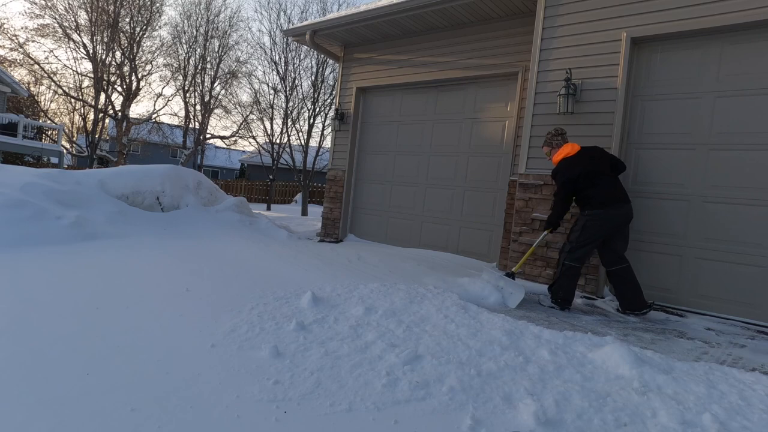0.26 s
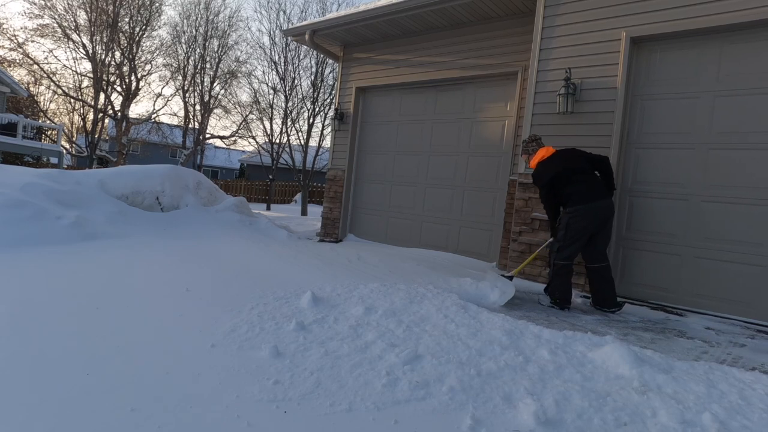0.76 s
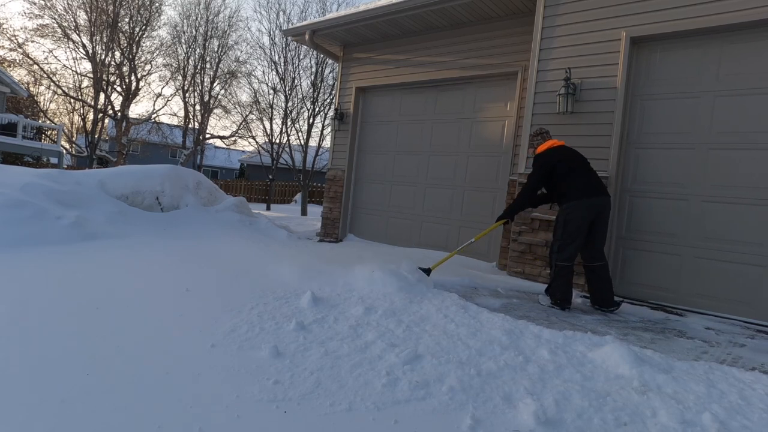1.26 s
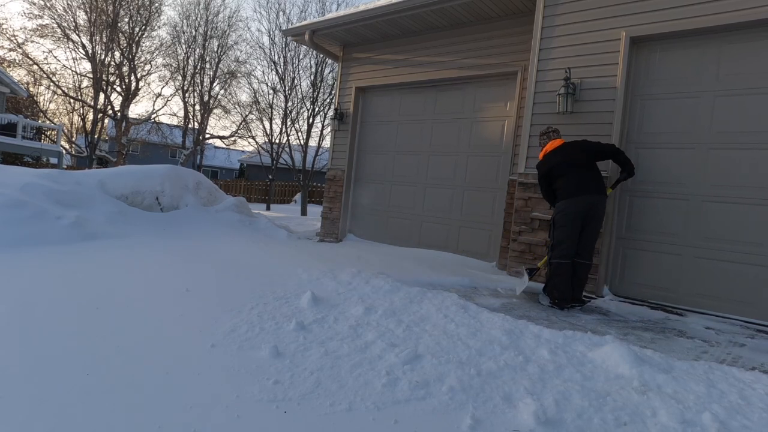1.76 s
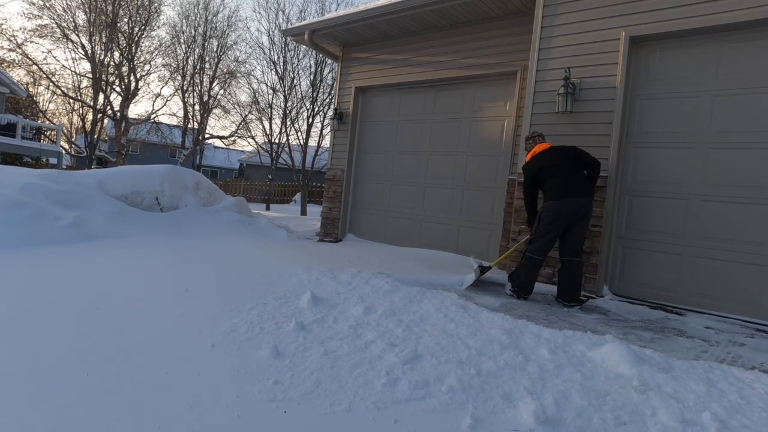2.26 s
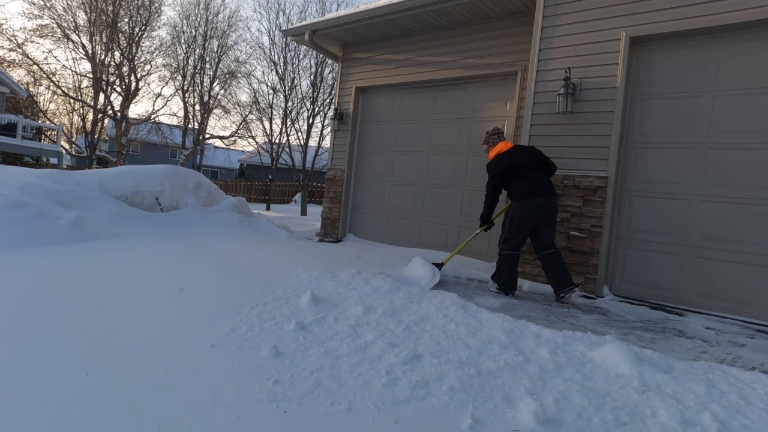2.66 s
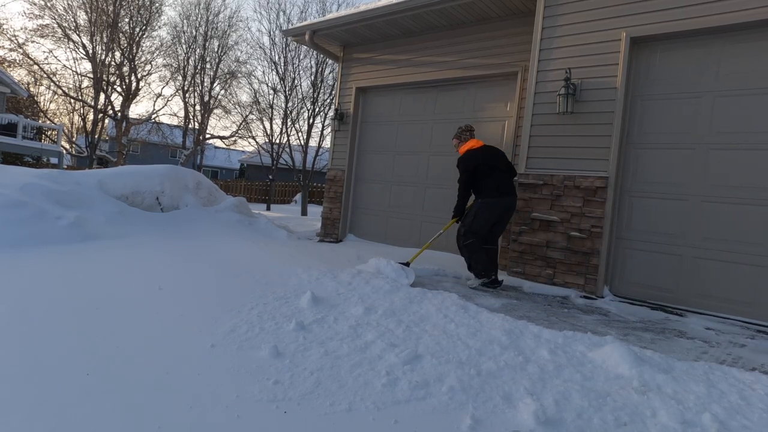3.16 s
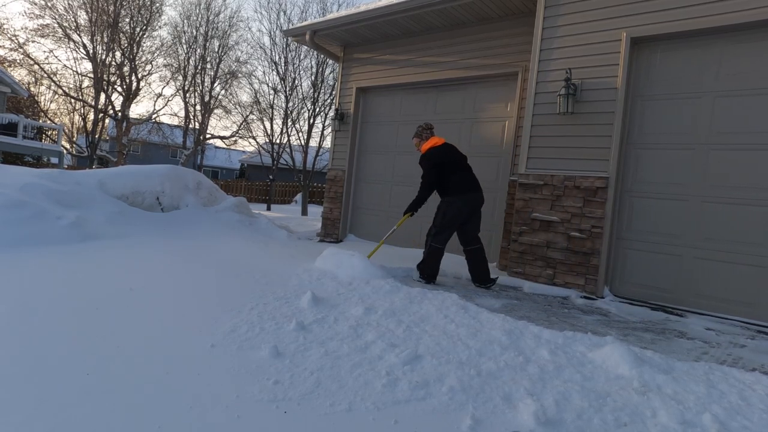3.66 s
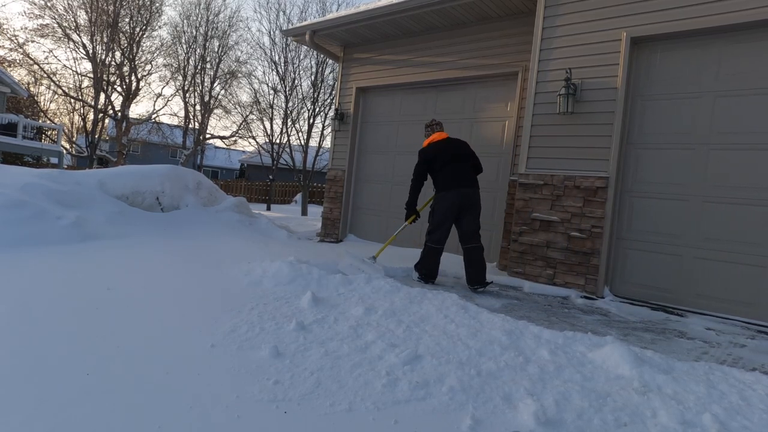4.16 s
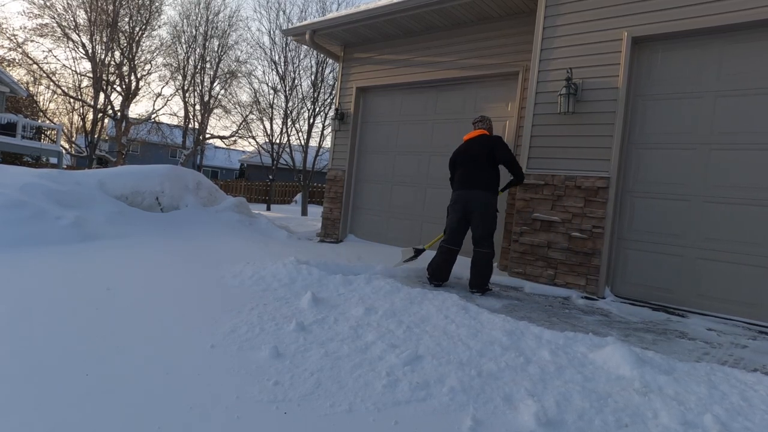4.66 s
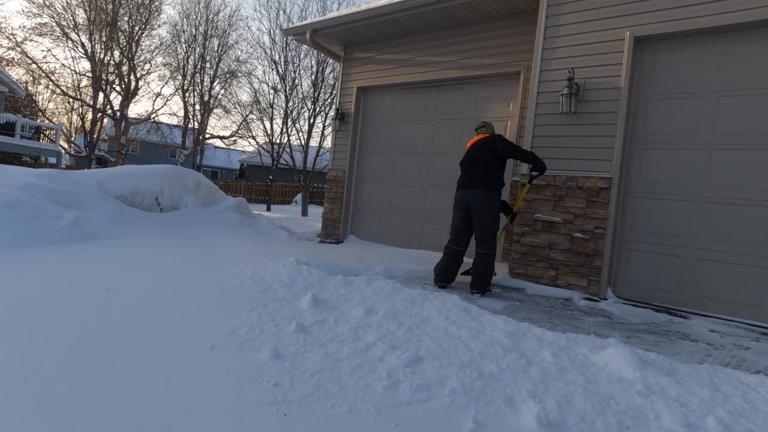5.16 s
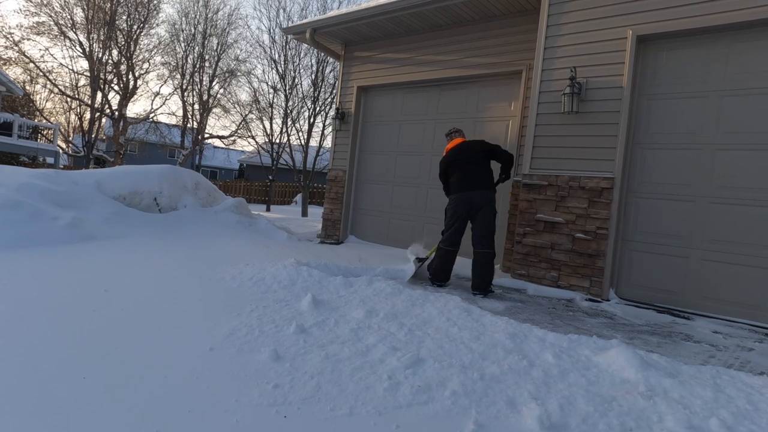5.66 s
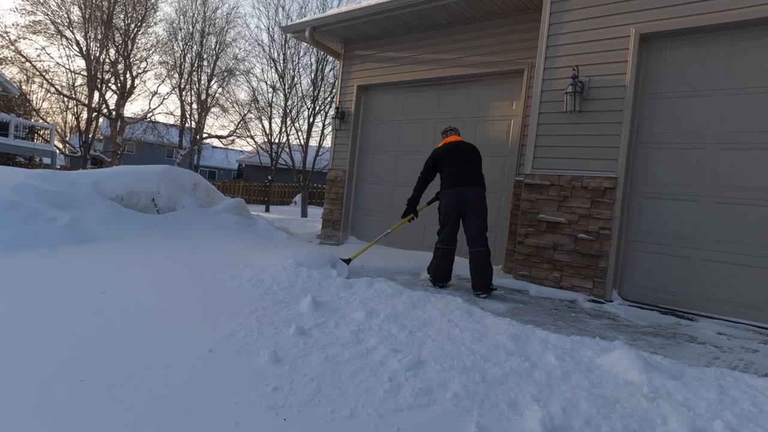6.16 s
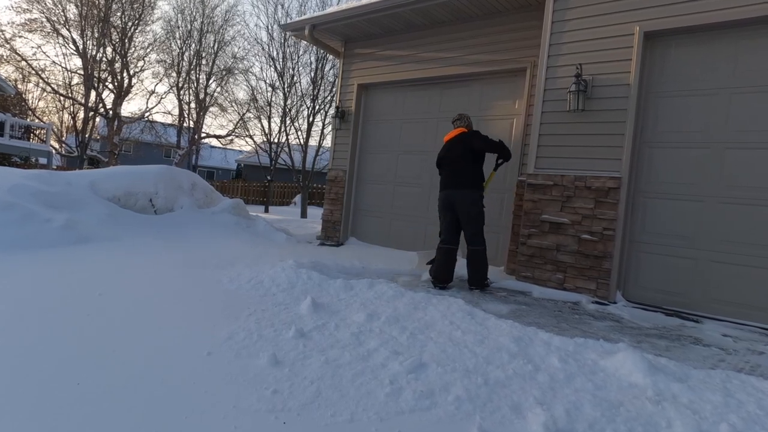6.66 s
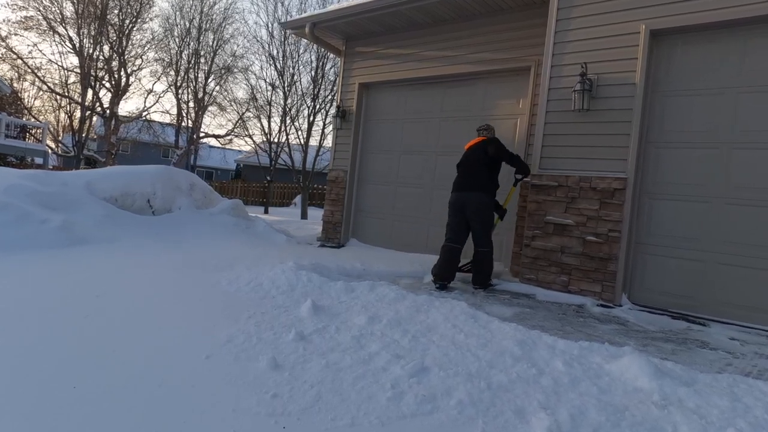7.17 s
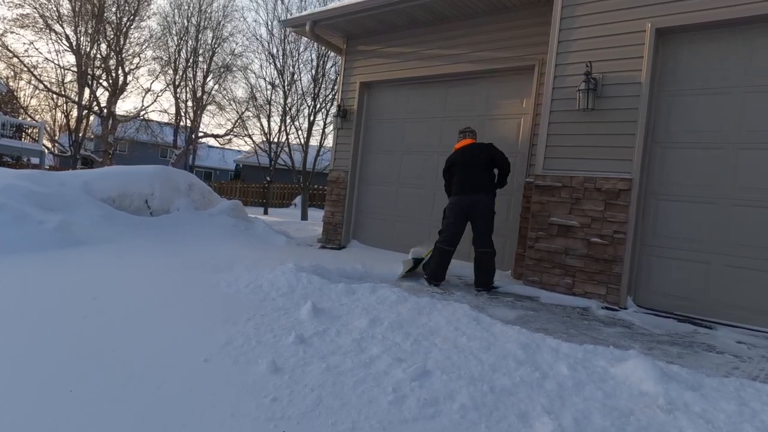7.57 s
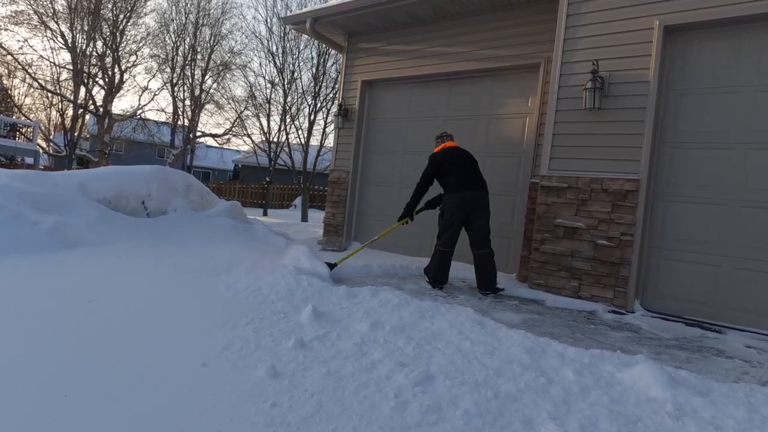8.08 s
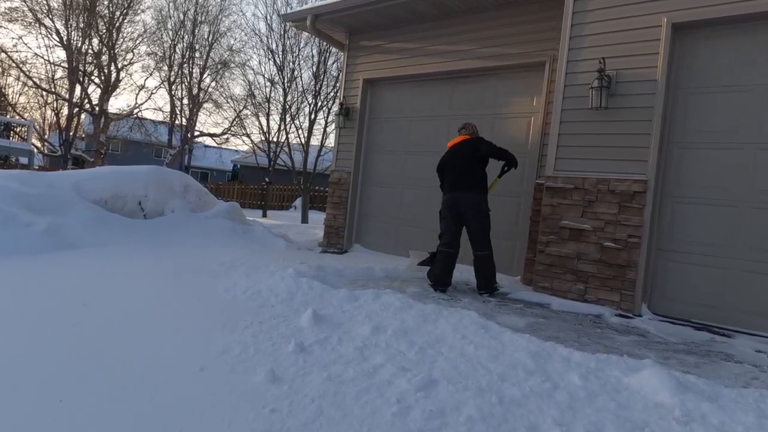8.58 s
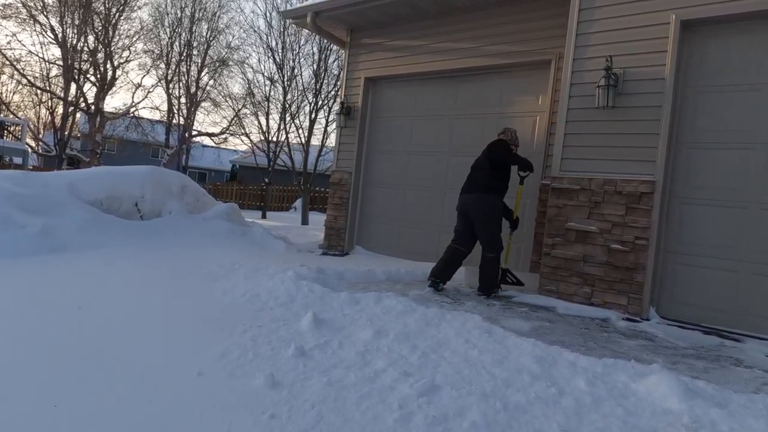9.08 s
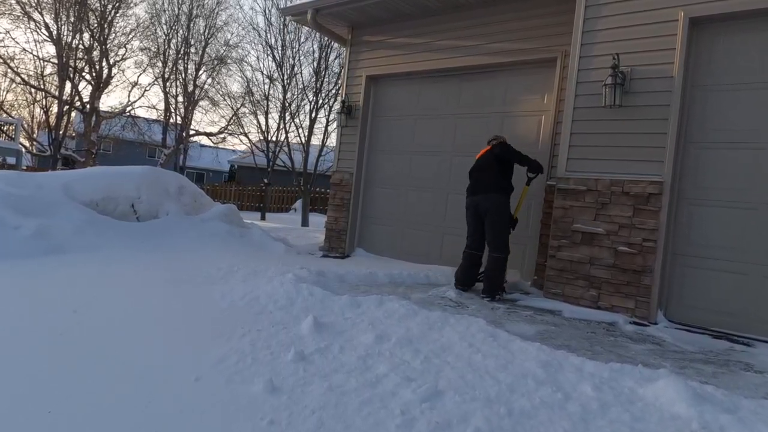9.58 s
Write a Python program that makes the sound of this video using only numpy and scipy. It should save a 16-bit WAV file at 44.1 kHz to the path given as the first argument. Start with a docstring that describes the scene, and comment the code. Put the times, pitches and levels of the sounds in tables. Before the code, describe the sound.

Repeated shovel shoves grate through snow and ice on paving, turning brighter and grittier, while an engine idles low and air puffs hit the microphone.

```python
"""A plastic snow shovel is pushed over a paved driveway in front of a garage wall, a few metres away.
From the start: air hits the microphone, grains crunch under the edge, ice catches and snaps, the scoop booms.
An engine idles throughout (two harmonics and a drone) under far traffic, rumble and air (filtered noise).
From about 5 s the stereo image widens; from about 7 s bare paving adds a bright rasp of fine grit.
A last, slowly fading puff of air comes at 9.2 s."""
import sys
import numpy as np
from scipy import signal
from scipy.fft import rfft, irfft
from scipy.io import wavfile
from scipy.ndimage import uniform_filter1d, map_coordinates

SR = 44100
rng = np.random.default_rng(int(sys.argv[2]) if len(sys.argv) > 2 else 0)


def put_to_file(sound):
    """Save the sound as 16-bit audio at rate SR, in the file named by the first command-line argument."""
    columns = np.atleast_2d(sound).T  # one column per channel
    safe = np.clip(columns, -1, 1)
    whole_steps = np.round(safe * 32767)
    wavfile.write(sys.argv[1], SR, whole_steps.astype(np.int16))


N = 433503

# Shoves of the shovel. Each row: start in seconds, length in seconds, crunch force in dB, swell over the
# length in dB, boom relative to crunch in dB, chatter relative to crunch in dB, build-up in seconds,
# fade by 60 dB in seconds.
SHOVES = [(0.0, 0.12, -41.5, -1.5, 9, 1, 0.1, 0.51), (0.233, 0.3, -51, 0.5, 13.5, 3.5, 0.3, 0.45),
          (0.591, 0.13, -40, 2.5, -1, -5, 0.055, 0.14), (0.788, 0.067, -35.5, 8.5, 3, -0.5, 0.095, 0.1),
          (0.876, 0.26, -38, 1, 10, 0, 0.11, 0.53), (1.438, 0.46, -60, 0, 20, 9.5, 0.2, 0.3),
          (1.99, 0.19, -44.5, 4, 10, 1.5, 0.074, 0.2), (2.172, 0.067, -36, -1.5, 5.5, 1, 0.11, 0.25),
          (2.266, 0.065, -38, 4, 3, 1, 0.1, 0.083), (2.365, 0.16, -41, -0.5, 2.5, -3.5, 0.03, 0.1),
          (2.58, 0.59, -40, -9.5, 4, -3.5, 0.2, 0.42), (3.488, 0.04, -43, -6, 6, -7, 0.13, 0.1),
          (3.529, 0.029, -36, -1.5, 3.5, -9, 0.055, 0.22), (3.64, 0.2, -41.5, 2, 6.5, -3.5, 0.21, 0.15),
          (3.875, 0.03, -42, -4.5, -1, -4, 0.05, 0.52), (4.326, 0.079, -43.5, -4, 5, 1, 0.064, 0.25),
          (5.246, 0.26, -54, 16, 10.5, 4, 0.1, 0.17), (5.551, 0.024, -31.5, 4, 1, -3.5, 0.12, 0.06),
          (5.6, 0.03, -28.5, 2, -0.5, 1.5, 0.05, 0.078), (5.636, 0.02, -36.5, -2.5, 4.5, 0, 0.1, 0.28),
          (5.741, 0.37, -38.5, 0.5, 6, 0.5, 0.13, 0.3), (6.78, 0.05, -54.5, -1, 0, -6, 0.18, 0.62),
          (7.107, 0.035, -42.5, -1, -12, -3, 0.06, 0.16), (7.195, 0.14, -37, -1, 2.5, 2, 0.047, 0.15),
          (7.43, 0.32, -40.5, 3.5, 3, 2, 0.065, 0.16), (7.69, 0.036, -35, -3, -2, -4, 0.02, 0.13),
          (7.755, 0.26, -40.5, -1, 6.5, 1, 0.1, 0.2), (8.028, 0.069, -38, 1.5, 6, 3, 0.21, 0.4),
          (8.66, 0.07, -55, 2, -4, -9, 1, 0.44), (9.201, 0.059, -46.5, 6.5, 1, 0, 0.65, 0.2),
          (9.316, 0.12, -40.5, -3, 10.5, 6, 0.21, 0.13), (9.652, 0.016, -42.5, 2.5, 10, 3.5, 0.21, 0.071),
          (9.74, 0.079, -42.5, -10.5, 9, 4.5, 0.06, 0.2)]
# The edge catches hard on ice. Each row: time in seconds, surge in dB, boom relative to it in dB,
# blade chatter relative to it in dB.
ICE_CATCHES = [(0.077, -31.5, 7, 1), (0.172, -34.5, 20.5, 5), (0.474, -36, 7, -8), (0.651, -21.5, -6, -20),
               (0.714, -30, 3, 1), (0.823, -26, 10.5, -5), (1.012, -27, 9, -1), (1.085, -34, 6, 2),
               (1.108, -37, 14, 2), (1.225, -44.5, 20, 11), (1.99, -32, 15.5, 4), (2.263, -39, -7, -4),
               (2.366, -29.5, 7, -9), (2.415, -30, -6, -12), (2.435, -33, -4, -3), (2.486, -26, 4.5, -8),
               (2.522, -27, -11, -19), (2.583, -26.5, -5, -5), (2.85, -38, -2, -7), (2.985, -40, -2, 1),
               (4.366, -28, -3, 4), (5.207, -36, -8, 0), (5.475, -26.5, -11, -5), (5.572, -28.5, -3, 6),
               (5.74, -29.5, 5, 0), (5.848, -28.5, 8, -1), (6.035, -27, -8, -11), (6.123, -30.5, -10, -3),
               (6.167, -40.5, 1, 9.5), (6.981, -33, 5, 2), (7.104, -44, -7, -5), (7.19, -35, -9, 8),
               (7.275, -31, -6, -10), (7.322, -37, -3, 11), (7.426, -30.5, -8, 1), (7.461, -30, 5, 2),
               (7.483, -29, -7, 4), (7.587, -31, 5, 7.5), (7.711, -27.5, 4, -3), (8.075, -32, 5, 7),
               (8.098, -39, 4, -2), (8.159, -37, 9, 7), (9.081, -38, -5, -4), (9.125, -37.5, -4.5, 3),
               (9.413, -31.5, 1, -6)]
CATCH_RISE_S, CATCH_T60_S = 0.0051, 0.1
# Lesser random catches during a shove; level relative to its force, before smoothing over the rise.
SNAGS_PER_S, SNAG_DB, SNAG_T60_S, SNAG_RISE_S = 14, -8.5, 0.043, 0.0042
# Bareness of the paving. Each row: time in seconds, rasp relative to crunch in dB.
BARE_PAVING = [(0, -21), (0.8, -43), (1.05, -25), (2.0, -23), (2.6, -20.5), (4.4, -23), (5.2, -12),
               (5.5, -9), (5.8, -13), (6.15, -15), (6.8, -0.5), (7.0, -7.5), (7.48, -2.5), (7.8, -5),
               (8.15, -11.5), (8.6, -1.5), (9.83, -2)]
# Loose grit crushed under the edge; level before the rasp and scrape are mixed.
PEBBLES_PER_S, PEBBLE_DB, PEBBLE_T60_S = 98, -10, 0.0095
# Caught grains chink; level relative to the scrape on full ice, half that amplitude in snow.
CHINKS_PER_S, CHINK_DB, CHINK_T60_S = 170, -5.5, 0.038
CHINK_LOW_HZ, CHINK_HIGH_HZ = 1486, 6430
# Resonances of scoop, blade and edge. Each row: frequency in Hz, width in Hz, relative level in dB.
SCOOP_MODES = [(292, 75, -4), (383, 73, 0), (438.7, 19.3, 4.5), (506.7, 38, 0.5), (702, 150, 0),
               (814, 142, -7.5)]
BLADE_MODES = [(909, 69, 2.5), (1224, 150, 0.5), (1483, 87, -0.5), (1660, 130, -5), (1880, 78, -3.5),
               (2136, 69, -7)]
EDGE_MODES = [(2300, 320, 0), (2760, 580, 6), (3370, 220, 3), (4180, 130, -3), (4730, 150, 8),
              (5750, 560, 1.5), (6500, 300, -3)]
# Spectra of edge in snow, edge on packed snow and ice, rasp on paving, ice snap.
# Each row: frequency in Hz, relative level in dB per Hz.
CRUNCH_SPECTRUM = [(500, -1), (1200, -13), (2300, 1), (3600, 0), (4800, -3), (6300, -8.5), (7400, -11.5),
                   (9000, -20.5), (10500, -37), (15000, -55)]
SCRAPE_SPECTRUM = [(500, -5), (1200, -18), (2200, 2), (3400, 1.5), (4200, -2), (5700, -3), (6550, -4.5),
                   (7100, -10), (8400, -19.5), (10000, -22), (15000, -79)]
RASP_SPECTRUM = [(2500, -14), (4500, 10.5), (6300, 6.5), (7400, 2.5), (8600, -3.5), (10000, 1.5),
                 (11000, -3.5), (12200, -2.5), (13200, -14), (14200, -15), (15500, -45)]
SNAP_SPECTRUM = [(150, -23), (400, -8), (900, -6.5), (1800, -0.5), (3000, 0), (4000, -2.5), (5900, -8),
                 (6800, -17.5), (9000, -31.5), (10500, -41), (14000, -64)]
# Snow lumps or bumps thump the scoop. Each row: time in seconds, level at the peak in dB before the
# lowpass, favoured pitch in Hz, decay by 60 dB in seconds.
THUMPS = [(0.809, -32, 560, 0.04), (0.868, -20.5, 450, 0.069), (0.886, -25, 480, 0.058),
          (0.902, -21, 470, 0.07), (0.955, -28, 500, 0.06), (1.017, -19, 503, 0.058),
          (1.054, -34, 760, 0.06), (1.083, -27, 620, 0.063), (1.137, -23, 460, 0.1),
          (1.162, -27.5, 540, 0.07), (1.228, -30, 600, 0.065), (1.257, -26, 470, 0.04),
          (2.003, -27, 620, 0.06), (2.155, -23.5, 380, 0.085), (2.18, -32.5, 594, 0.08),
          (2.202, -23, 370, 0.083), (3.635, -30, 430, 0.12), (3.736, -32, 560, 0.12),
          (3.775, -30, 460, 0.06), (3.918, -33, 420, 0.054), (8.532, -43, 650, 0.03),
          (9.42, -32, 500, 0.06), (9.647, -29, 420, 0.089), (9.65, -34, 1300, 0.075)]
THUMP_RISE_S, THUMP_TOP_HZ = 0.0013, 2800
THUMP_FOCUS_DB = 17  # loss of a resonance one octave from the favoured pitch
# One resonance sings. Each row: middle in seconds, pitch in Hz, level in dB, time from the middle to
# -17 dB in seconds, glide in Hz per second.
SINGS = [(0.175, 740, -30, 0.019, 0), (0.687, 1255, -31, 0.0099, 0), (1.166, 723, -23, 0.018, 0),
         (2.22, 1370, -35, 0.055, 1400), (2.235, 369, -26, 0.04, 0), (2.268, 1430, -28, 0.0087, 0),
         (7.21, 3260, -35, 0.016, 0), (7.262, 925, -47, 0.088, 0), (7.279, 2090, -29, 0.0098, 0),
         (7.316, 3270, -44, 0.014, 0), (7.318, 2050, -34, 0.016, 0), (7.687, 5600, -32, 0.004, -0.5),
         (8.09, 792, -30, 0.032, 0), (9.335, 988, -34, 0.095, 1300), (9.346, 1640, -36, 0.02, 0),
         (9.659, 956, -30.5, 0.023, 0)]
# Chips of ice snap. Each row: time in seconds, crack level over 5 ms in dB, tilt in dB per octave,
# decay by 60 dB in seconds.
ICE_SNAPS = [(0.166, -36, -5, 0.02), (0.1756, -25.5, -10, 0.025), (0.322, -48, 5, 0.025),
             (0.888, -27, 0, 0.027), (0.895, -29, 4, 0.025), (0.8995, -20.5, 2, 0.015),
             (0.9006, -17, 5.5, 0.019), (0.9057, -24, 1, 0.02), (1.99, -25.5, -5.5, 0.031),
             (2.265, -23.5, -4, 0.02), (2.323, -34, -3, 0.025), (2.417, -31, 6, 0.025),
             (2.536, -37, 2, 0.025), (2.587, -33, -1, 0.025), (2.754, -38, 2, 0.02),
             (3.488, -42.5, 2, 0.022), (3.557, -40, -2, 0.025), (3.737, -34, -3, 0.035),
             (4.3633, -26, -4, 0.024), (4.378, -34, 9, 0.034), (4.3875, -31, -5, 0.02),
             (5.481, -28, 3, 0.025), (5.555, -25.5, -3, 0.039), (5.606, -21, 1, 0.03),
             (5.627, -24, 0, 0.02), (5.805, -34, -3, 0.024), (6.048, -28, 4, 0.02), (6.125, -31.5, 0, 0.02),
             (6.171, -39, -3, 0.02), (7.104, -39, -3, 0.02), (7.192, -37, -5, 0.03),
             (7.233, -30.5, 6, 0.015), (7.275, -28, -1, 0.025), (7.321, -29, -3, 0.03),
             (7.461, -30, 0, 0.018), (7.485, -28, 0, 0.018), (7.517, -32, 5, 0.012), (7.589, -33, 9, 0.015),
             (7.685, -31, 11, 0.028), (7.717, -30, 10, 0.02), (7.74, -32, 5, 0.034), (7.959, -31, 3, 0.013),
             (8.06, -35, 4, 0.015), (8.103, -34, -2, 0.018), (8.161, -37, -2, 0.02), (9.082, -43, -2, 0.02),
             (9.347, -34, 0, 0.025), (9.522, -40, 2.5, 0.015), (9.611, -43, 7.5, 0.017),
             (9.648, -31, -11, 0.051)]
# Reflections off paving, doors and wall. Each row: delay in seconds, level in dB.
ECHOES = [(.0037, -21), (.0083, -17.5), (0.0143, -17), (0.024, -37)]
# Low background. Each row: time in seconds, engine hum in dB, drone in dB, rumble in dB.
BACKGROUND = [(0, -32.5, -29, -26.5), (1.3, -34, -40, -33), (1.8, -37.5, -38, -32.5),
              (2.2, -35, -42, -28.5), (3.0, -37, -37, -33), (3.4, -32, -30.5, -30.5),
              (5.0, -32.5, -32, -29.5), (7.0, -32, -29, -30.5), (8.3, -33, -32, -29),
              (9.83, -31, -34.5, -29)]
FIRING_HZ, FIRST_DB, SECOND_DB = 45.3, -0.5, -0.5  # harmonic levels relative to the hum
DRONE_HZ, DRONE_WIDTH_HZ = 70.7, 11
# Spectra of far traffic, rumble and moving air. Each row: frequency in Hz, relative level in dB per Hz.
TRAFFIC_SPECTRUM = [(120, -34), (200, -5.5), (280, -12.5), (410, -7.5), (520, -14.5), (720, -18.5),
                    (1240, -27.5), (1850, -30.5), (3000, -38.5), (3940, -43), (7000, -50), (9500, -54.5),
                    (12000, -59.5), (14000, -75)]
RUMBLE_SPECTRUM = [(12, -7.5), (28, 6), (38, -7.5), (56, 4.5), (85, -2), (105, 1.5), (145, -2), (175, 2.5),
                   (215, -11), (260, -9.5), (500, -72), (4000, -120)]
BUFFET_SPECTRUM = [(10, -2), (30, -0.5), (60, 5.5), (110, -3), (165, -13), (250, -26), (500, -40.5),
                   (6000, -115)]
TRAFFIC_DB = -35.5
# Puffs of air on the microphone. Each row: start in seconds, level in dB, decay by 60 dB in seconds.
GUSTS = [(0.0, -51, 1.4), (0.198, -16.5, 0.65), (0.392, -19, 0.22), (0.53, -24, 0.35), (2.13, -54, 1.3),
         (2.36, -32.5, 0.76), (9.2, -26, 3.2)]
GUST_RISE_S, BREEZE_DB = 0.0075, -38
# Opening of the stereo image. Each row: time in seconds, gain in dB added to both side spectra below.
OPENING = [(4.9, -18), (5.25, 1), (5.6, 10), (6.3, 13), (7.2, 19), (9.83, 22)]
# Side spectra of shovelling and surroundings before the opening gain.
# Each row: frequency in Hz, side relative to mid in dB.
SHOVEL_WIDTH = [(60, -31), (200, -44), (380, -49), (690, -35), (1300, -36.5), (2400, -33.5), (4400, -34.5),
                (8000, -51), (14000, -23)]
AIR_WIDTH = [(25, -25), (60, -35), (200, -50), (380, -40.5), (690, -30), (1300, -25.5), (2400, -23),
             (4400, -23), (8000, -23), (14000, -28)]
# Hiss of the microphones. Each row: frequency in Hz, relative level in dB per Hz.
HISS_SPECTRUM = [(5000, -33), (9500, -6), (11000, 6), (12200, 15), (12900, 20), (13500, -10), (14500, -28)]
HISS_DB = -74
DIP_S, DIP_DB, DIP_HALF_S = 3.865, -11, 0.0049  # one brief level dip
CUTOFF_HZ = 14700


def shovel(snowy_db=-22, icy_db=-14):
    """Grains of snow and ice break under the edge and shake the blade and the scoop."""
    crunch, boom, chatter = np.hypot(shove_forces() * judder(), catch_forces())
    bare_db = in_time(BARE_PAVING)[0]
    fractures = grains(per_s=4500, spread_db=0.5)
    slips = grains(per_s=1500, spread_db=1.5)
    grit = grains(per_s=7200, spread_db=-0.5)

    # soft snow crunches dully; ice scrapes harder
    icy = np.clip((bare_db - snowy_db) / (icy_db - snowy_db), 0, 1)
    ring = even(flex(resonate(slips, EDGE_MODES, wander_db=6.0)))
    in_snow = even(colour(fractures + from_db(-14.5) * ring, CRUNCH_SPECTRUM))
    on_ice = even(colour(fractures + from_db(-13) * ring, SCRAPE_SPECTRUM))
    chink = from_db(CHINK_DB) * (1 + icy) / 2 * chinks()
    edge = even((1 - icy) * in_snow + icy * on_ice + chink)

    # bare paving: fine bright rasp and ticks of coarse grit
    coarse = from_db(PEBBLE_DB) * pebbles()
    fine = rms_one(colour(grit + 2 * coarse, RASP_SPECTRUM))
    rasp = from_db(bare_db) * fine + icy * coarse_ticks(coarse)

    blade = flex(resonate(slips + 0.7 * fractures, BLADE_MODES, wander_db=3.0))
    blade = blade + from_db(-17.0) * fractures
    blade = even(colour(blade, [(400, -11.5), (850, 4.5), (2300, 1.0), (4500, -5.5), (12000, -64)]))
    scoop = resonate(slips, SCOOP_MODES, wander_db=2.0)
    scoop = even(colour(scoop, [(150, -25.5), (270, 8.0), (850, -3), (2000, -12.5), (9000, -46)]))
    return crunch * (edge + rasp) + chatter * blade + boom * scoop


def shove_forces():
    """Each shove builds up, swells or eases, and dies away; it drives crunch, boom and chatter."""
    power = np.zeros((3, N))
    for s, length_s, db, swell_db, boom_db, chatter_db, build_s, fade_s in SHOVES:
        first = max(int((s - build_s) * SR), 0)
        last = min(int((s + length_s + fade_s) * SR), N)
        at = np.arange(first, last)
        corners_s = [-build_s, 0, length_s, length_s + fade_s]
        force_db = np.interp(at / SR - s, corners_s, [-60, 0, swell_db, swell_db - 60])
        shares = from_db([[0], [boom_db], [chatter_db]])
        power[:, at] += (shares * from_db(db + force_db)) ** 2
    return np.sqrt(power)


def judder():
    """The edge sticks, slips and snags; lumps of snow shift force between crunch, boom and chatter."""
    hits = rng.random(N) < SNAGS_PER_S / SR
    decay = from_db(-60 / (SNAG_T60_S * SR))
    snags = signal.lfilter([from_db(SNAG_DB)], [1, -decay], hits + 1e-18)
    snags = uniform_filter1d(snags, int(SNAG_RISE_S * SR) + 1)
    lumps = np.array([from_db(1.38 * drift(knots_per_s=22)) for _ in range(3)])
    stick_slip = from_db(1.54 * drift(knots_per_s=60) + 0.29 * drift(knots_per_s=230))
    return rms_one(lumps * (1 + snags) * stick_slip)


def catch_forces():
    """Each catch on ice is a sudden surge of force that dies away in crunch, boom and chatter."""
    strengths = np.array([from_db(db) * from_db([0, boom_db, chatter_db])
                          for _, db, boom_db, chatter_db in ICE_CATCHES])
    surges = np.array([surge(row[0], CATCH_RISE_S, CATCH_T60_S) for row in ICE_CATCHES])
    return strengths.T @ surges


def grains(per_s, spread_db):
    """Random fractures: clicks of either sign, sizes spread exponentially in dB; rms 1."""
    sizes = from_db(spread_db * np.minimum(rng.exponential(1, N), 4))
    signs = rng.choice([-1, 1], N)
    return rms_one(sizes * signs * (rng.random(N) < per_s / SR))


def pebbles():
    """Separate coarse grains, each crushed in a tiny burst of noise; rms 1."""
    t = np.arange(1024) / SR
    power_decay = from_db(-60 * t / PEBBLE_T60_S) ** 2
    power = signal.oaconvolve(grains(PEBBLES_PER_S, spread_db=1.0) ** 2, power_decay)[:N]
    return rms_one(np.sqrt(np.maximum(power, 0)) * rng.standard_normal(N))


def coarse_ticks(x):
    """Give crushed grit the colour of the scraping edge, at unchanged level."""
    return np.std(x) * rms_one(colour(x, SCRAPE_SPECTRUM))


def chinks(rise_s=0.00092, spread_db=3):
    """Each caught grain rings the edge briefly, at a random pitch set by where it touches; rms 1."""
    out, t = np.zeros(N + 2048), np.arange(2048) / SR
    envelope = from_db(-60 * t / CHINK_T60_S) * (1 - np.exp(-t / rise_s))
    gaps, places, sizes = rng.random((4096, 3)).T
    starts = (np.cumsum(-np.log(1 - gaps)) * SR / CHINKS_PER_S).astype(int)
    pitches_hz = CHINK_LOW_HZ * (CHINK_HIGH_HZ / CHINK_LOW_HZ) ** places
    for start, hz, size in zip(starts[starts < N], pitches_hz, sizes):
        tone = envelope * np.sin(2 * np.pi * hz * t)
        out[start:start + len(t)] += from_db(spread_db * (2 * size - 1)) * tone
    return rms_one(out[:N])


def flex(x, bend=0.02):
    """The blade bends under load, so its resonances slide a little: a slow random time warp."""
    at = np.arange(N) + np.cumsum(bend * drift(knots_per_s=9))
    return map_coordinates(x, [at], order=3, mode="wrap")


def thumps(size=8192):
    """Each thump shakes scoop and blade; where it strikes decides which resonances answer most."""
    out, t = np.zeros(N + size), np.arange(size) / SR
    for s, db, favoured_hz, t60_s in THUMPS:
        shake, body = rng.standard_normal(2 * size), 0
        for k, (hz, width_hz, mode_db) in enumerate(SCOOP_MODES + BLADE_MODES):
            gain = from_db(mode_db - THUMP_FOCUS_DB * np.log2(hz / favoured_hz) ** 2)
            mode = signal.lfilter(*signal.iirpeak(hz, hz / width_hz, fs=SR), shake)
            body = body + (-1) ** k * gain * mode
        envelope = from_db(-60 * t / t60_s) * (1 - np.exp(-t / THUMP_RISE_S))
        start = int(s * SR)
        settled = even(body, span_s=0.018)[size:]
        out[start:start + size] += from_db(db) * envelope / envelope.max() * settled
    return signal.sosfilt(signal.butter(2, THUMP_TOP_HZ, fs=SR, output="sos"), out[:N])


def blade_sings(waver_hz=45, rough_db=1.5):
    """Stick-slip locks onto one resonance for a moment: a rough, wavering tone, in places gliding."""
    out, t = np.zeros(N), np.arange(N) / SR
    waver = np.cumsum(waver_hz * drift(knots_per_s=280)) / SR
    for s, hz, db, length_s, glide_hz_per_s in SINGS:
        near = np.abs(t - s) < 2 * length_s
        since = t[near] - s
        swell = np.exp(-2 * (since / length_s) ** 2)
        cycles = hz * since + glide_hz_per_s * since ** 2 / 2 + waver[near]
        out[near] += from_db(db) * swell * np.sqrt(2) * np.sin(2 * np.pi * cycles)
    return out * rms_one(from_db(rough_db * drift(knots_per_s=300)))


def ice_snap(ring_gain=0.5, grit_db=-4.5):
    """Each chip is a short noise burst that rings the blade; on bare paving it also spits grit."""
    out, t = np.zeros(N + SR), np.arange(4096) / SR
    bare_db = in_time(BARE_PAVING)[0]
    level_span = SR / 200  # 5 ms in samples
    for s, db, tilt_db, t60_s in ICE_SNAPS:
        start = int(s * SR)
        burst = rng.standard_normal(len(t)) * from_db(-60 * t / t60_s)
        crack = colour(burst, [(hz, level + tilt_db * np.log2(hz)) for hz, level in SNAP_SPECTRUM])
        grit = colour(burst, RASP_SPECTRUM)
        grit_gain = from_db(bare_db[start] + grit_db)
        chip = crack / np.linalg.norm(crack) + grit_gain * grit / np.linalg.norm(grit)
        out[start:start + len(chip)] += from_db(db) * np.sqrt(level_span) * chip
    return out[:N] + ring_gain * resonate(out[:N], BLADE_MODES, wander_db=5.0)


def garage_wall(x):
    """Hard surfaces close by return a few quick echoes."""
    at = np.arange(N)
    return x + sum(from_db(db) * np.interp(at - round(s * SR), at, x, left=0) for s, db in ECHOES)


def engine():
    """Two slightly wavering firing harmonics and an uneven drone, narrow-band noise, between them."""
    hum_db, drone_db, _ = in_time(BACKGROUND)
    phase = 2 * np.pi * np.cumsum(FIRING_HZ + 0.54 * drift(knots_per_s=7)) / SR
    first = from_db(hum_db + FIRST_DB + 2.2 * drift(knots_per_s=8)) * np.sin(phase)
    second = from_db(hum_db + SECOND_DB + 2.0 * drift(knots_per_s=5)) * np.sin(2 * phase)
    edges_hz = [DRONE_HZ - DRONE_WIDTH_HZ / 2, DRONE_HZ + DRONE_WIDTH_HZ / 2]
    band = signal.butter(2, edges_hz, "band", fs=SR, output="sos")
    hollow = signal.sosfilt(band, rng.standard_normal(N + SR))[SR:]  # skip the filter's start-up
    drone = from_db(drone_db) * even(hollow, span_s=0.73)
    return np.sqrt(2) * (first + second) + drone


def outdoors():
    """Far traffic with its low rumble, and lumps of moving air at the microphone: coloured noise."""
    _, _, rumble_db = in_time(BACKGROUND)
    traffic = from_db(TRAFFIC_DB) * rms_one(colour(rng.standard_normal(N), TRAFFIC_SPECTRUM))
    rumble = rms_one(colour(rng.standard_normal(N), RUMBLE_SPECTRUM))
    rumble = from_db(rumble_db + 1.08 * drift(knots_per_s=10)) * rumble
    breeze = from_db(BREEZE_DB + 2.3 * drift(knots_per_s=5))
    air = breeze + sum(from_db(db) * surge(s, GUST_RISE_S, t60_s) for s, db, t60_s in GUSTS)
    buffet = air * even(colour(rng.standard_normal(N), BUFFET_SPECTRUM), span_s=0.087)
    return traffic + rumble + buffet


def microphone_hiss():
    """Independent coloured noise in each channel."""
    noise = [rms_one(colour(white, HISS_SPECTRUM)) for white in rng.standard_normal((2, N))]
    return from_db(HISS_DB) * np.array(noise)


def scatter(x, t60_s=0.038):
    """The same sound arriving from the sides by many short paths, nearly uncoloured."""
    t = np.arange(4096) / SR
    paths = rfft(rng.standard_normal(len(t)) * from_db(-60 * t / t60_s))
    flat = irfft(paths / np.abs(paths))[:len(t) // 2]
    return signal.oaconvolve(x, flat / np.linalg.norm(flat))[:N]


def resonate(x, modes, wander_db):
    """Parallel resonances of alternating sign; the contact point shifts, so each is fed unevenly."""
    out = 0
    for k, (hz, width_hz, db) in enumerate(modes):
        r = np.exp(-np.pi * width_hz / SR)
        poles = [1, -2 * r * np.cos(2 * np.pi * hz / SR), r * r]
        fed = x * from_db(db + wander_db * drift(knots_per_s=18))
        out = out + (-1) ** k * (1 - r * r) / 2 * signal.lfilter([1, 0, -1], poles, fed + 1e-18)
    return out


def colour(x, spectrum, size=8192):
    """Causal (minimum-phase) filter with the given spectrum."""
    hz = np.arange(size // 2 + 1) * SR / size
    cepstrum = irfft(np.log(from_db(at_hz(spectrum, hz))))
    cepstrum[1:size // 2] *= 2  # fold to minimum phase
    cepstrum[size // 2 + 1:] = 0
    return signal.oaconvolve(x, irfft(np.exp(rfft(cepstrum))))[:N]


def surge(s, rise_s, t60_s):
    """An envelope that jumps up at time s and dies away."""
    out, start = np.zeros(N), int(np.clip(s * SR, 0, N - 1))
    t = np.arange(min(N - start, int(2 * t60_s * SR))) / SR
    out[start:start + len(t)] = from_db(-60 * t / t60_s) * (1 - np.exp(-t / rise_s))
    return out


def even(x, span_s=0.0268):
    """Hold the short-time level at 1: grain and colour change, loudness does not."""
    return x / np.sqrt(np.maximum(uniform_filter1d(x * x, int(span_s * SR)), 1e-20))


def drift(knots_per_s):
    """Smooth random curve through random knots, rms 1."""
    knots = rng.standard_normal(4096)
    at = np.arange(N // 20 + 1) * 20 * knots_per_s / SR  # every 20th sample
    coarse = map_coordinates(knots, [at], order=3, mode="wrap")
    return rms_one(np.interp(np.arange(N) / 20, np.arange(len(coarse)), coarse))


def in_time(rows):
    """The columns of a curve table, at every sample."""
    s, *columns = np.transpose(rows)
    return [np.interp(np.arange(N) / SR, s, c) for c in columns]


def at_hz(points, hz):
    """Read a spectrum on a log-frequency axis."""
    points = np.array(points)
    return np.interp(np.log(np.maximum(hz, 1)), np.log(points[:, 0]), points[:, 1])


def from_db(db):
    """Decibels to gain."""
    return 10 ** (np.asarray(db) / 20)


def rms_one(x):
    """Scale to rms 1."""
    return x / np.sqrt(np.mean(x ** 2) + 1e-20)


def scene():
    """Mid holds every source; scattered shovelling and separate outdoor noise widen the image."""
    shovelling = garage_wall(shovel() + thumps() + blade_sings() + ice_snap())
    mid = shovelling + engine() + outdoors()
    side = colour(scatter(shovelling), SHOVEL_WIDTH) + colour(outdoors(), AIR_WIDTH)
    side = from_db(in_time(OPENING)[0]) * side
    return np.array([mid + side, mid - side]) + microphone_hiss()


def record(dry):
    """The level dips once, briefly; the top is cut steeply."""
    since = np.arange(N) / SR - DIP_S
    dip = from_db(DIP_DB * np.exp(-(since / DIP_HALF_S) ** 2))
    lowpass = signal.ellip(10, .1, 90, CUTOFF_HZ, fs=SR, output="sos")
    return signal.sosfilt(lowpass, dry * dip)


dry = scene()
out = record(dry)
put_to_file(out)
```